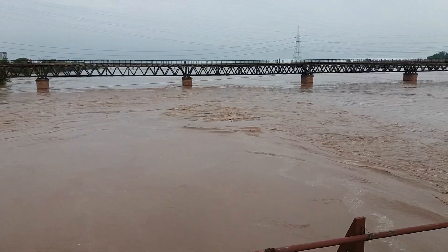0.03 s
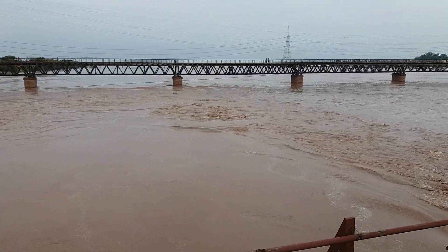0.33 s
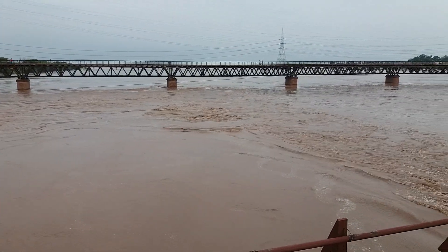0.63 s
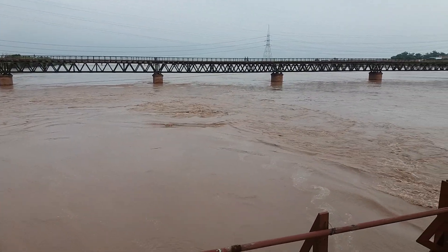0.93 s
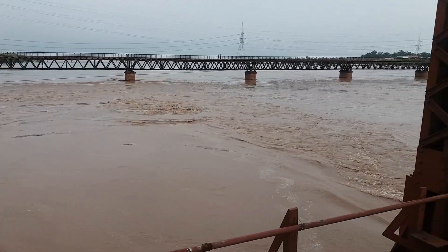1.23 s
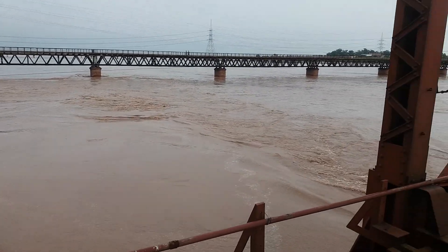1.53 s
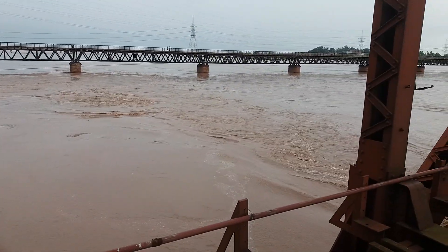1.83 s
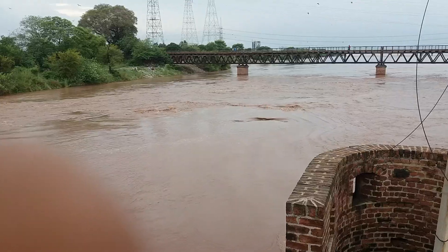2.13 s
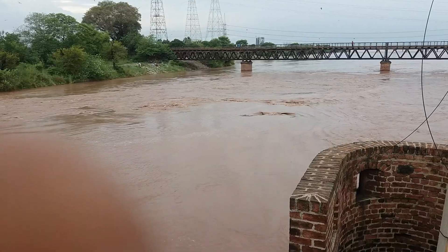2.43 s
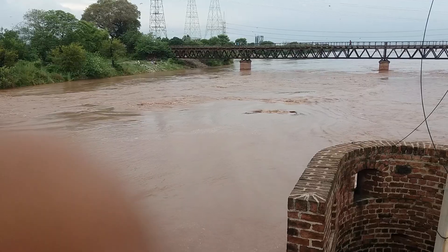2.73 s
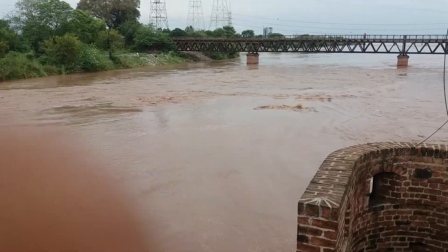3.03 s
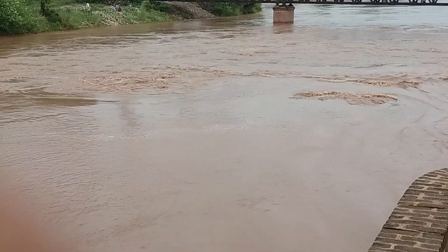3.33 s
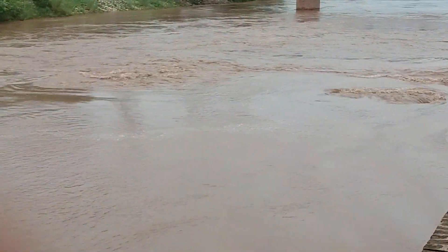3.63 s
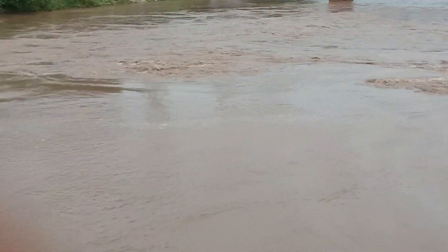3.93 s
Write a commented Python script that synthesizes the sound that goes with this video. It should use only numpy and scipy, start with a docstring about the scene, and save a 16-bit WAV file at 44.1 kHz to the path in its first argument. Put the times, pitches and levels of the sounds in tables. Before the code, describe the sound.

Wind gusts buffet the microphone over the dull rush of a wide river.

```python
"""A high bridge over a wide river in flood. On the open deck, gusts buffet the microphone over the water's
far, dull rush, with no single splashes. Halfway, the sound cuts with a click to a sheltered spot by a
brick pier, where the wind is only a soft flutter and the water comes forward.
A faint microphone hiss lies under both spots."""
import sys
import numpy as np
from scipy import signal
from scipy.fft import rfft, irfft, next_fast_len
from scipy.io import wavfile
from scipy.ndimage import uniform_filter1d, map_coordinates

SR = 44100
rng = np.random.default_rng(int(sys.argv[2]) if len(sys.argv) > 2 else 0)


def wav_out(sig):
    """Save sig, one row per channel (or a flat mono array), as 16-bit PCM at SR to the path in sys.argv[1]."""
    wavfile.write(sys.argv[1], SR, np.round(np.clip(np.atleast_2d(sig).T, -1, 1) * 32767).astype(np.int16))


N = 176400
CUT_S = 2.0883  # from the deck to the pier


def amp(db):
    """Decibels to gain."""
    return 10 ** (np.asarray(db) / 20)


def unit(x):
    """Scale to rms 1."""
    return x / np.sqrt(np.mean(x ** 2) + 1e-20)


def curves(rows):
    """One envelope for each column after the time, with a value per sample."""
    times, *columns = np.transpose(rows)
    return [np.interp(np.arange(N) / SR, times, column) for column in columns]


def wobble(rate_hz):
    """A smooth random drift through rate_hz points a second."""
    return map_coordinates(rng.standard_normal(2048), [np.arange(N) * rate_hz / SR], mode="wrap")


def filtered(x, gain_at):
    """Filter x with a gain given as a function of frequency in Hz."""
    size = next_fast_len(N + SR // 2)
    hz = np.fft.rfftfreq(size, 1 / SR)
    return irfft(rfft(x, size) * gain_at(hz), size)[:N]


def coloured(x, spectrum):
    """Equalise x through (Hz, dB) points on a log frequency axis, then scale to rms 1."""
    points_hz, points_db = np.transpose(spectrum)

    def gain_at(hz):
        return amp(np.interp(np.log(hz + 1), np.log(points_hz), points_db, right=-120))
    return unit(filtered(x, gain_at))


def churn(patchy_db):
    """White noise that swells and sinks in random patches of time and frequency."""
    spectrogram = signal.stft(rng.standard_normal(N), nperseg=512)[2]
    patches = uniform_filter1d(rng.standard_normal(spectrogram.shape), 5, axis=0)  # smooth in frequency
    patches = unit(uniform_filter1d(patches, 14, axis=1))  # and in time
    return signal.istft(spectrogram * amp(patchy_db * patches), nperseg=512)[1][:N]


def turbulence(spectrum, lump_db, lump_hz):
    """Pressure lumps of uneven size pass the microphone port."""
    lumps = rng.standard_normal(N) * amp(lump_db * wobble(lump_hz))
    return coloured(lumps, spectrum)


def deck_wind():
    """Gusts thump on the microphone; the stronger they blow, the more fine eddies they tear off."""
    # The gusts on the open deck. Each row: time in seconds, strength in dB.
    gusts = [(0, -21), (.1, -19.5), (.22, -26.5), (.28, -21.5), (.35, -28.5), (.43, -23), (.5, -28),
             (.65, -24.5), (.72, -29.5), (.77, -23), (.87, -24.5), (.91, -29), (1.07, -25.5), (1.12, -21.5),
             (1.18, -29), (1.44, -24), (1.63, -32), (1.87, -33.5), (1.94, -27), (2.08, -32)]
    # The tone of the deep buffeting. Each row: frequency in Hz, relative level in dB.
    buffet_tone = [(20, -46), (30, -29), (40, -15.5), (58, -2), (90, 0.5), (130, -1), (200, -10.5),
                   (300, -18), (450, -31), (700, -44), (1500, -70)]
    # The brighter tone of the eddies. Each row: frequency in Hz, relative level in dB.
    eddy_tone = [(80, -24.5), (170, -2), (280, -2.5), (400, -8.5), (600, -19.5), (1000, -32), (2500, -57)]
    strong_gust_db, eddy_growth = -26, 1.62  # growth in dB per dB of wind
    strength_db, = curves(gusts)
    eddy_db = -44 + eddy_growth * (strength_db - strong_gust_db)
    thumps = amp(strength_db) * turbulence(buffet_tone, lump_db=1, lump_hz=30)
    eddies = amp(eddy_db) * turbulence(eddy_tone, lump_db=2.5, lump_hz=40)
    return thumps + eddies


def sheltered_wind():
    """Behind the pier only a soft flutter reaches the microphone."""
    # The breeze in the shelter. Each row: time in seconds, strength in dB.
    breeze = [(2.09, -40), (2.35, -43), (2.55, -45.5), (2.9, -42.5), (3.17, -47), (3.3, -42), (3.68, -44),
              (3.8, -37.5), (3.93, -42), (4, -38.5)]
    # The tone of the low flutter. Each row: frequency in Hz, relative level in dB.
    flutter_tone = [(20, -44), (35, -23), (60, 0), (100, -0.5), (170, 0), (260, -6), (400, -15.5),
                    (700, -26), (1500, -60)]
    strength_db, = curves(breeze)
    return amp(strength_db) * turbulence(flutter_tone, lump_db=1.5, lump_hz=22)


def open_river():
    """Countless far waves merge into one steady, slightly churning rush."""
    # The river's tone from the deck. Each row: frequency in Hz, relative level in dB.
    rush_tone = [(40, -16.5), (200, 7), (450, 2.5), (700, 1.5), (1000, -5.5), (1400, -7), (1650, -10.5),
                 (2000, -11), (2500, -18), (3600, -24), (4200, -32.5), (6000, -44)]
    level_db = -50 + 0.4 * wobble(rate_hz=4.2)
    return amp(level_db) * coloured(churn(patchy_db=0.85), rush_tone)


def pier_river():
    """The water rushes by the pier; its spray fades as the microphone turns away."""
    # The water's balance. Each row: time in seconds, rush level in dB, spray level in dB.
    levels = [(2.09, -48.5, -72), (2.4, -49, -74), (2.8, -48.5, -81), (3.2, -51, -78), (3.55, -50.5, -82),
              (3.75, -49.5, -84), (4, -50, -80)]
    # The river's tone by the pier. Each row: frequency in Hz, relative level in dB.
    rush_tone = [(40, -24), (200, 5), (420, 4), (600, 0), (780, 0.5), (1000, -3.5), (1250, -8.5),
                 (1700, -12.5), (2150, -13.5), (2550, -19.5), (3100, -32), (4200, -36), (6000, -56)]
    # The bright tone of the spray. Each row: frequency in Hz, relative level in dB.
    spray_tone = [(1200, -25), (2200, 0.5), (2900, 1), (3600, -6.5), (5000, -15), (8000, -35)]
    rush_db, spray_db = curves(levels)
    drift_db = 0.51 * wobble(rate_hz=5.87)
    rush = amp(rush_db + drift_db) * coloured(churn(patchy_db=1.12), rush_tone)
    spray = amp(spray_db) * coloured(churn(patchy_db=2.0), spray_tone)
    return rush + spray


def cut_click(level_db=-24.5, sink_s=0.0016):
    """The pressure sinks, then snaps back in one step where the two spots are joined."""
    until_cut_s = CUT_S - np.arange(N) / SR
    return -amp(level_db) * (until_cut_s > 0) * np.exp(-np.abs(until_cut_s / sink_s))


def microphone_hiss(level_db=-70):
    """The microphone's own noise, faint and steady."""
    # The airy tone of the hiss. Each row: frequency in Hz, relative level in dB.
    hiss_tone = [(500, -8), (4000, -6.5), (5500, -5.5), (7000, -2), (9500, 2), (12000, 1), (16000, 1.7)]
    return amp(level_db) * coloured(rng.standard_normal(N), hiss_tone)


def scene():
    """First the open deck, then the shelter by the pier, with hiss under both."""
    deck = deck_wind() + open_river()
    shelter = sheltered_wind() + pier_river()
    crossfade = np.clip((np.arange(N) / SR - CUT_S) / 0.003 + 0.5, 0, 1)  # 3 ms long
    outdoors = (1 - crossfade) * deck + crossfade * shelter
    return (outdoors + cut_click() + microphone_hiss())[None]


def record(dry):
    """A brick-wall low-pass takes off the very top of the treble."""
    top_hz = 15800
    return filtered(dry[0], lambda hz: hz < top_hz)[None]


dry = scene()
out = record(dry)
wav_out(out)
```